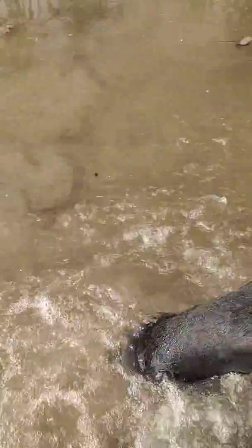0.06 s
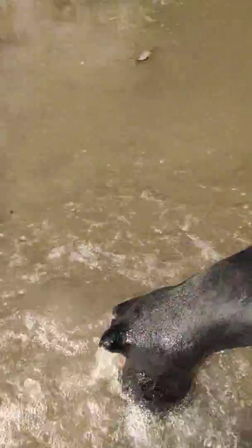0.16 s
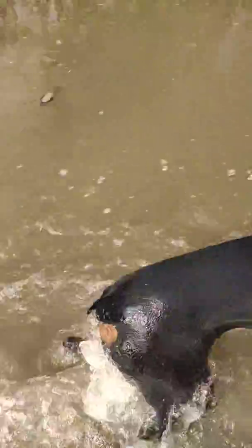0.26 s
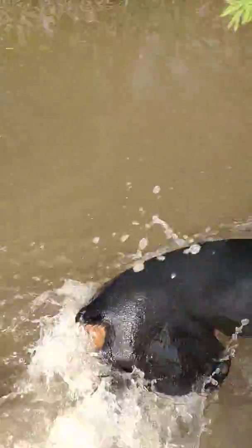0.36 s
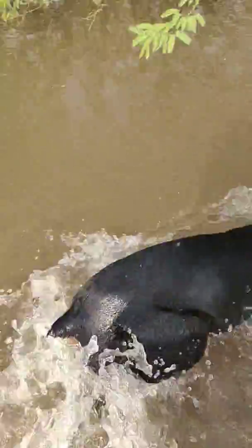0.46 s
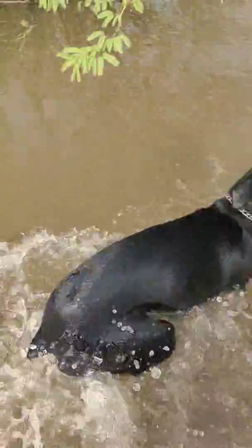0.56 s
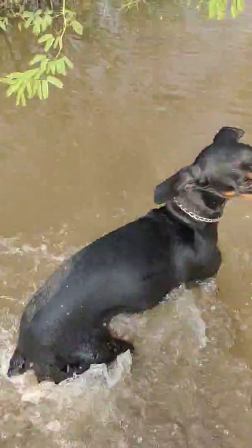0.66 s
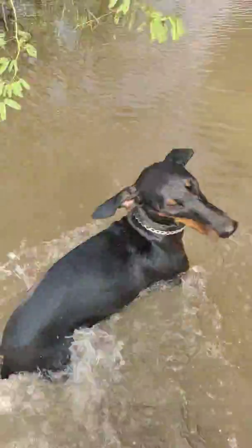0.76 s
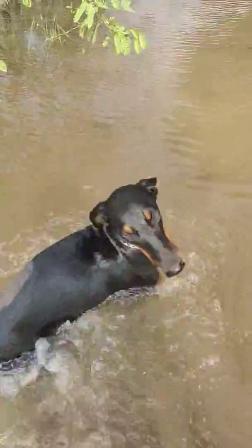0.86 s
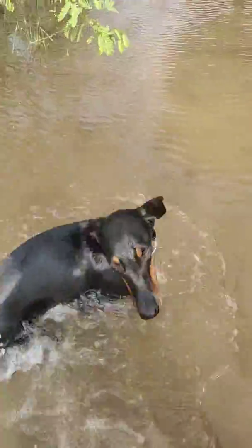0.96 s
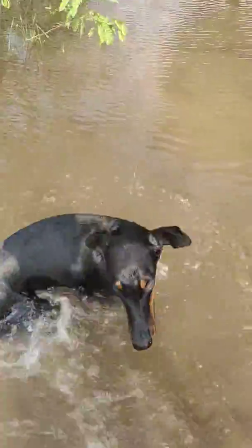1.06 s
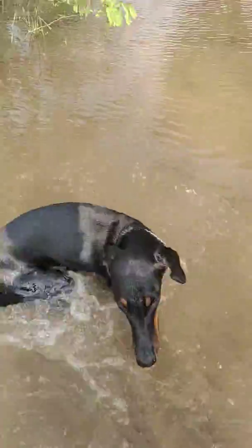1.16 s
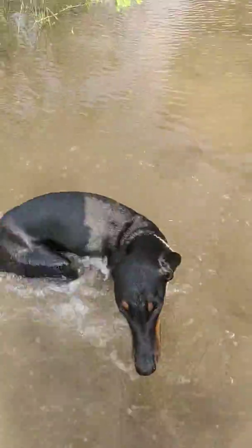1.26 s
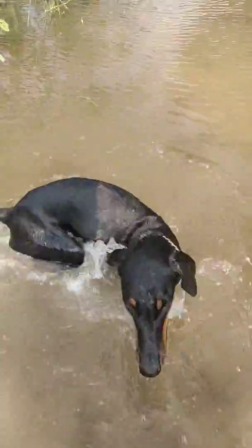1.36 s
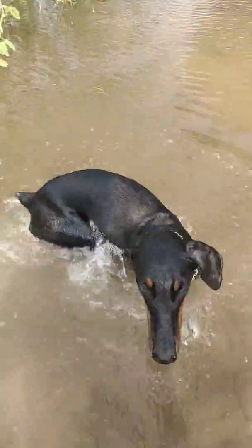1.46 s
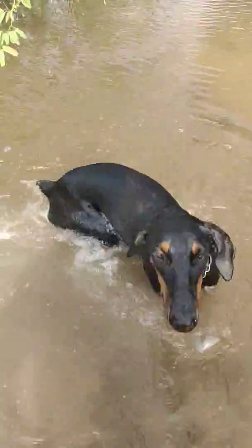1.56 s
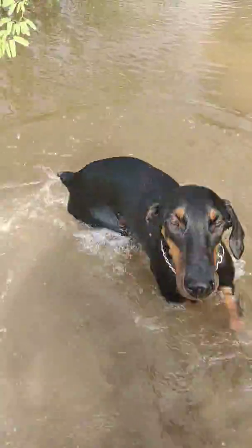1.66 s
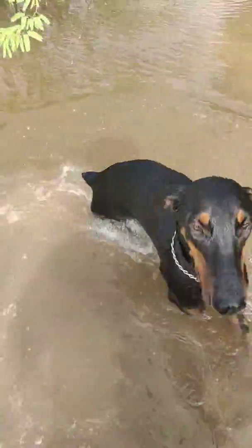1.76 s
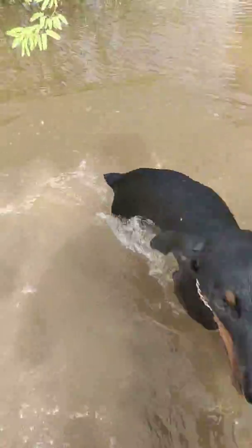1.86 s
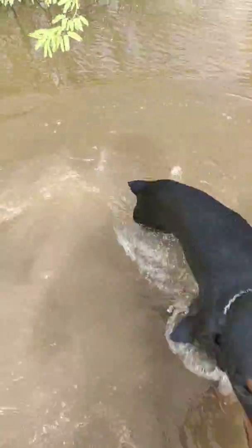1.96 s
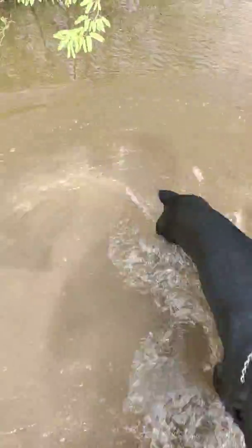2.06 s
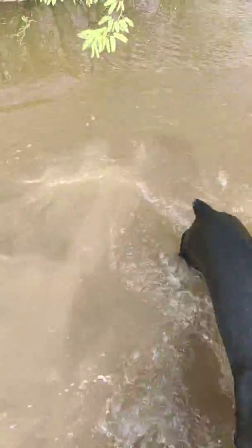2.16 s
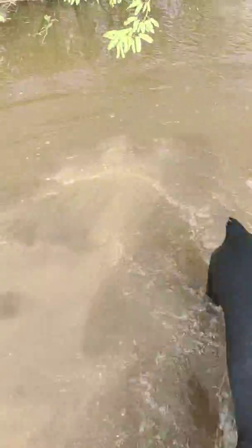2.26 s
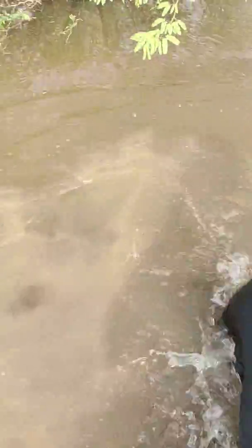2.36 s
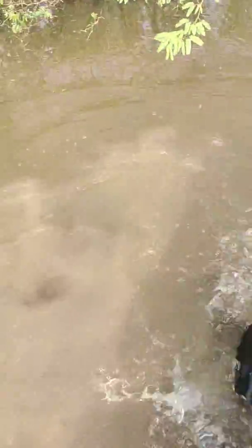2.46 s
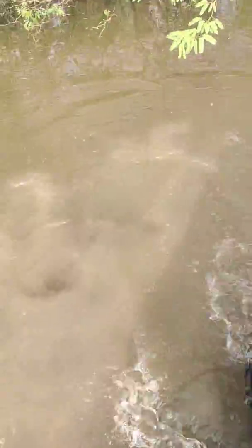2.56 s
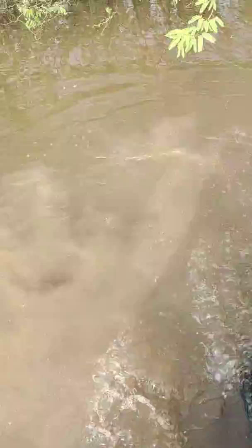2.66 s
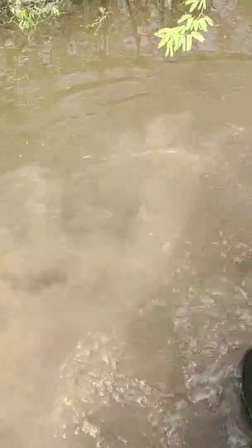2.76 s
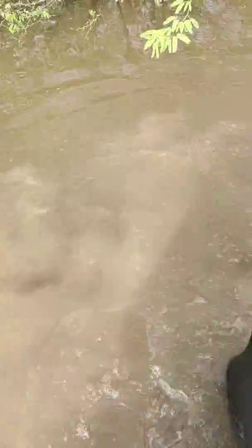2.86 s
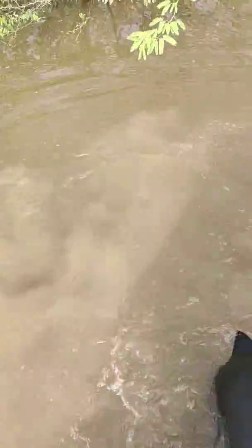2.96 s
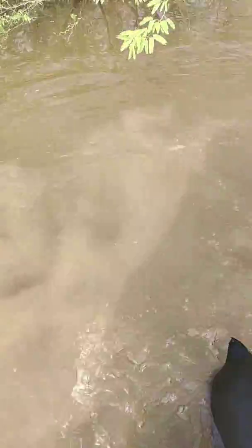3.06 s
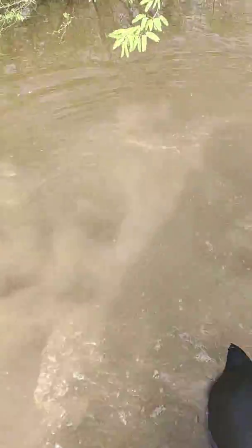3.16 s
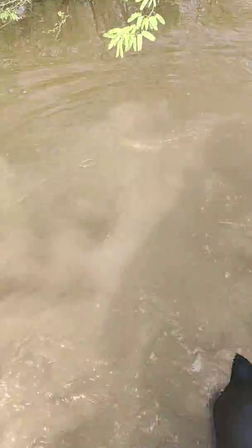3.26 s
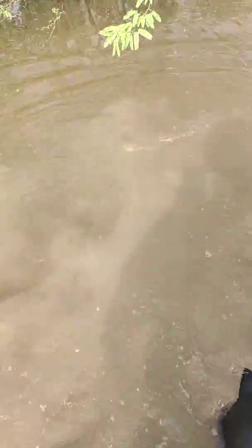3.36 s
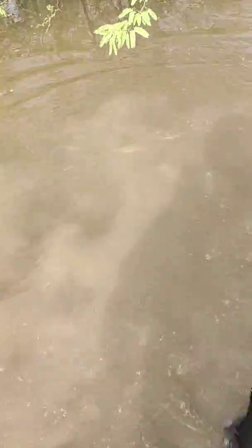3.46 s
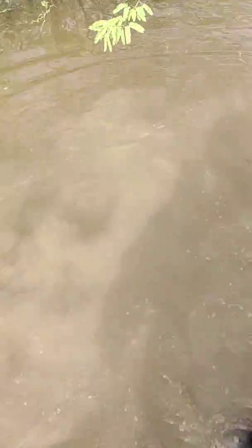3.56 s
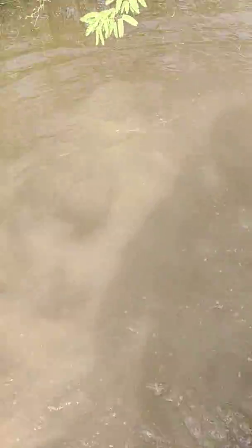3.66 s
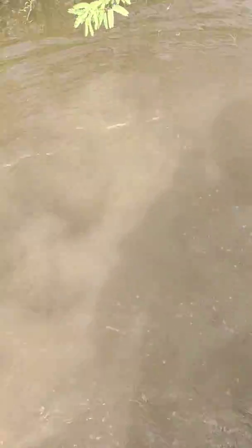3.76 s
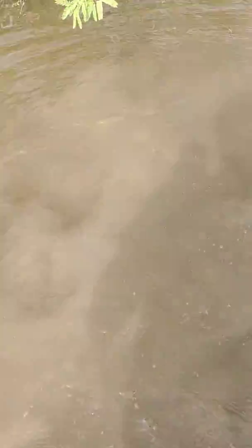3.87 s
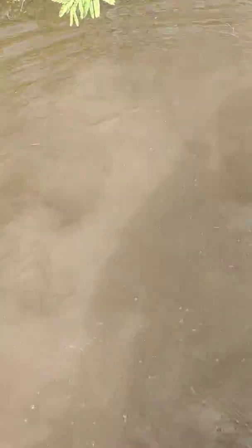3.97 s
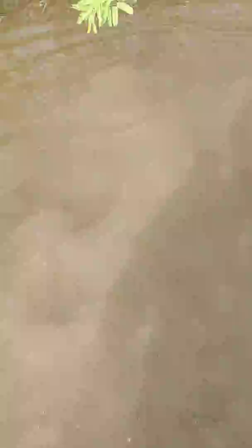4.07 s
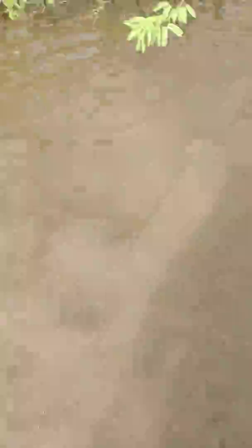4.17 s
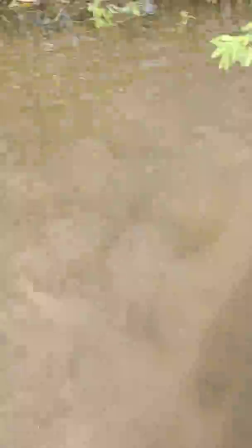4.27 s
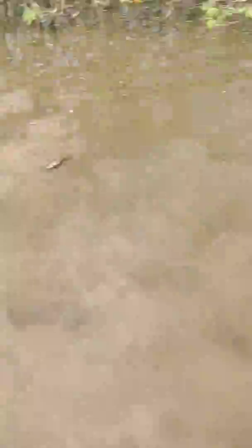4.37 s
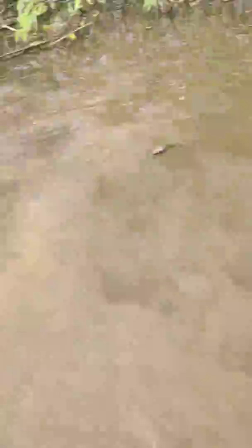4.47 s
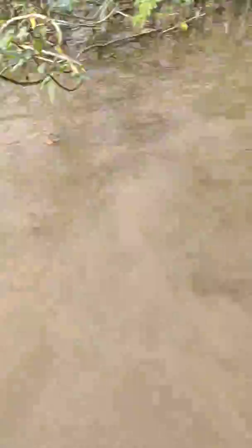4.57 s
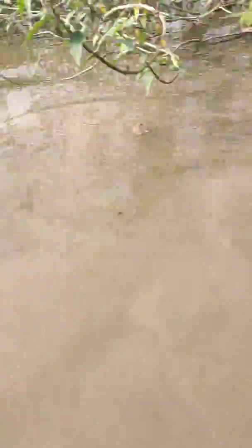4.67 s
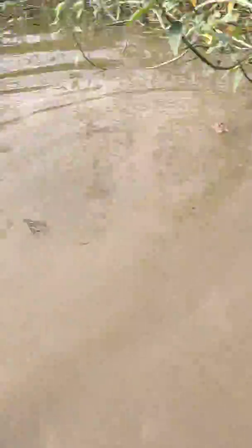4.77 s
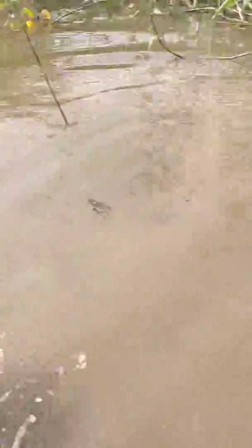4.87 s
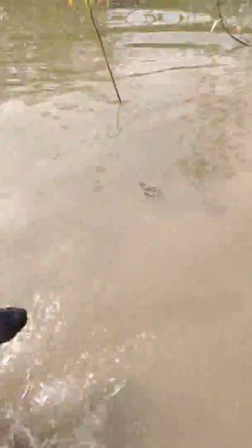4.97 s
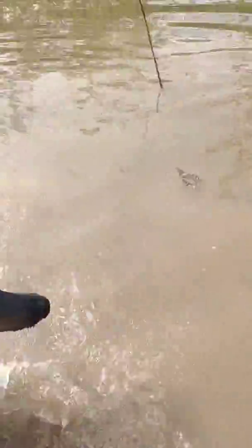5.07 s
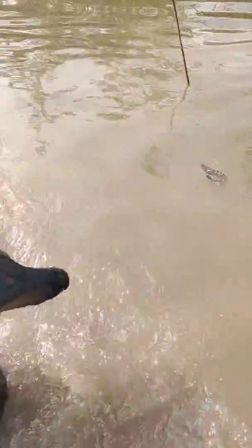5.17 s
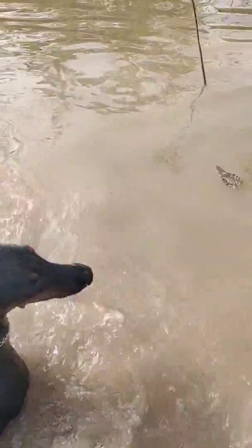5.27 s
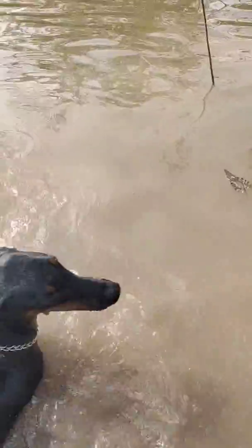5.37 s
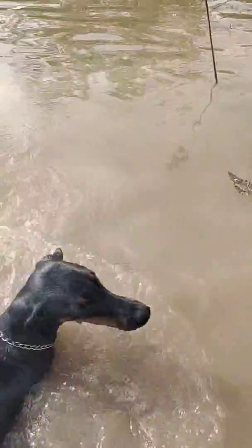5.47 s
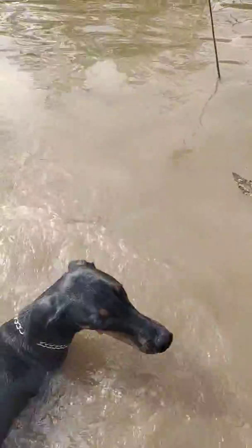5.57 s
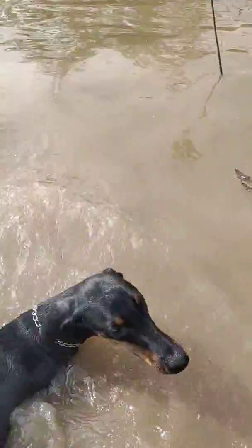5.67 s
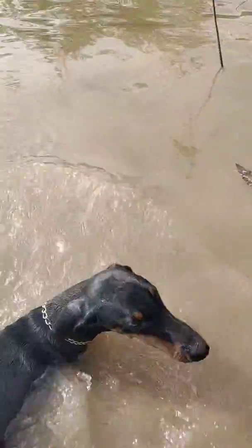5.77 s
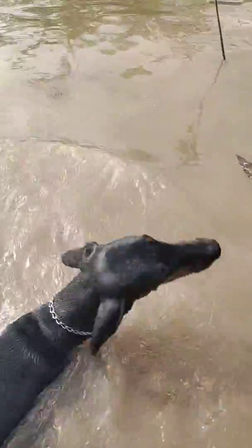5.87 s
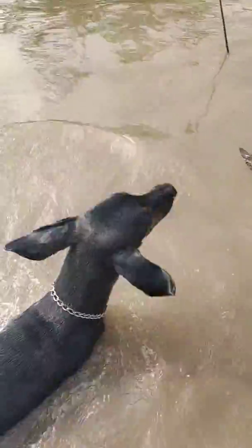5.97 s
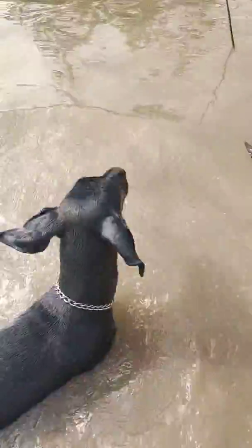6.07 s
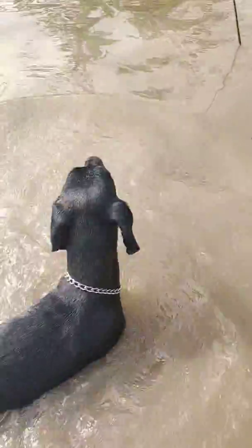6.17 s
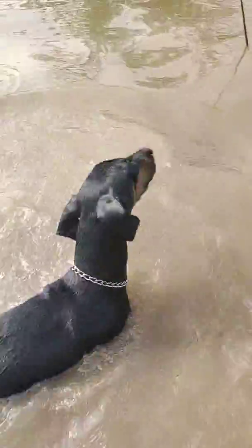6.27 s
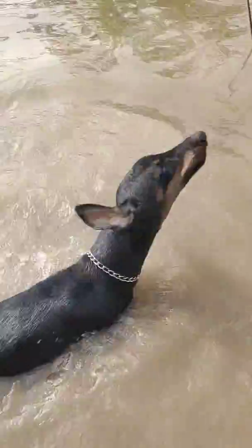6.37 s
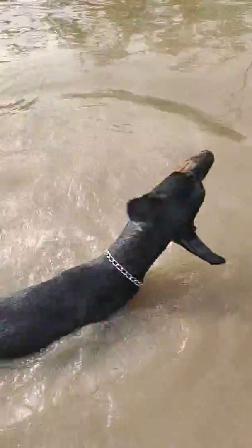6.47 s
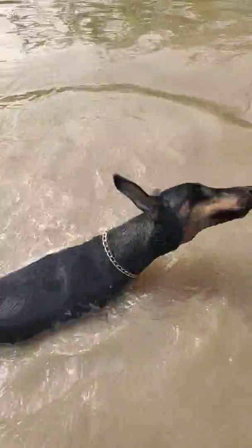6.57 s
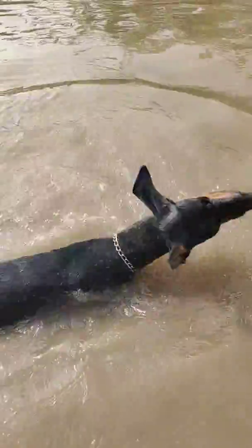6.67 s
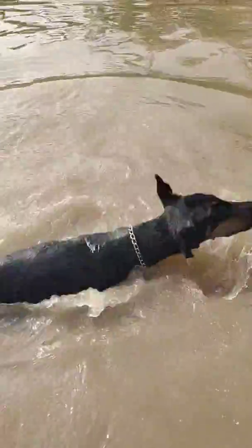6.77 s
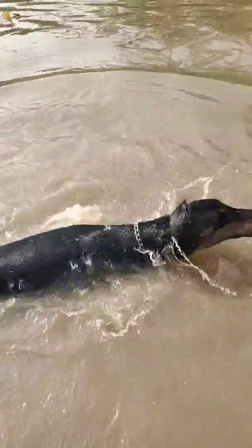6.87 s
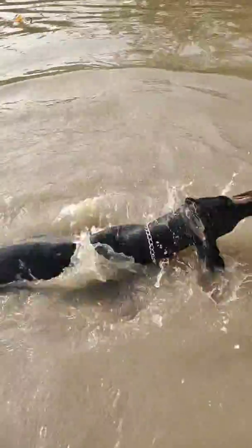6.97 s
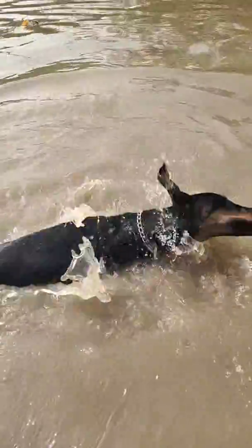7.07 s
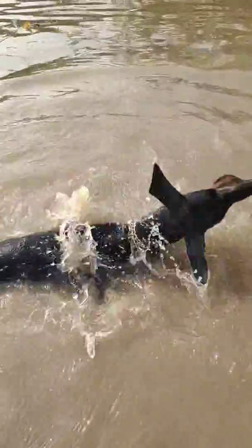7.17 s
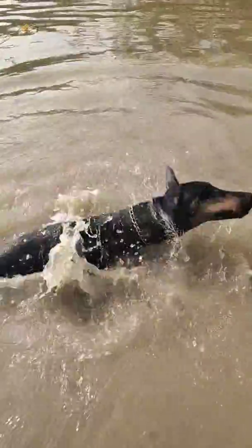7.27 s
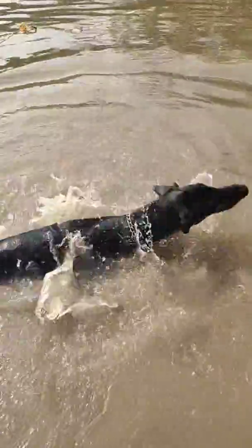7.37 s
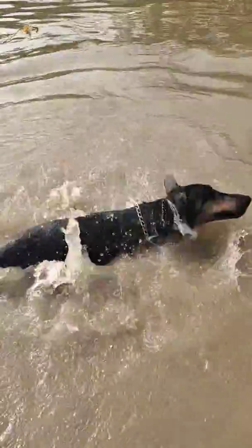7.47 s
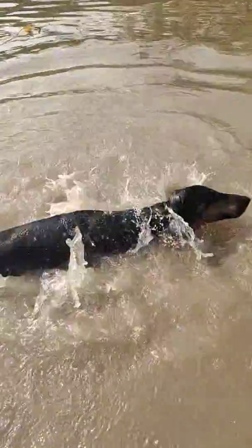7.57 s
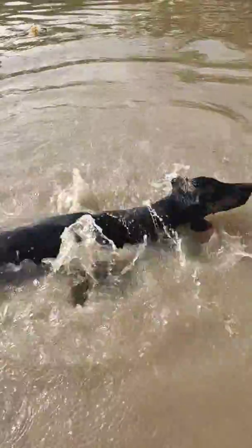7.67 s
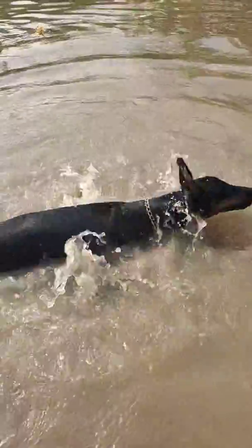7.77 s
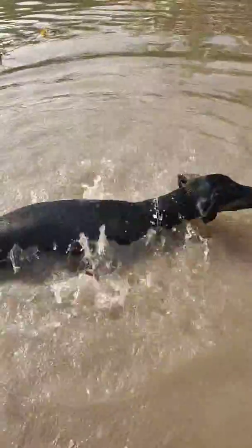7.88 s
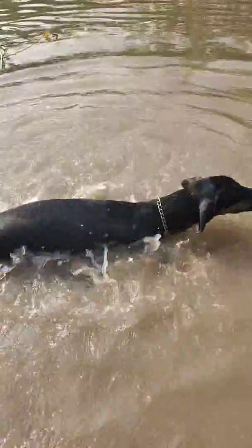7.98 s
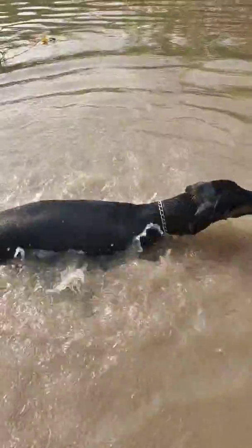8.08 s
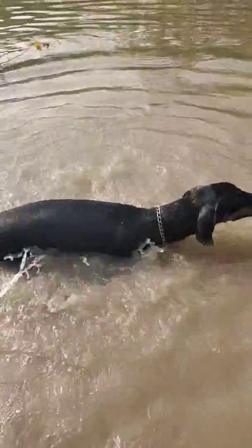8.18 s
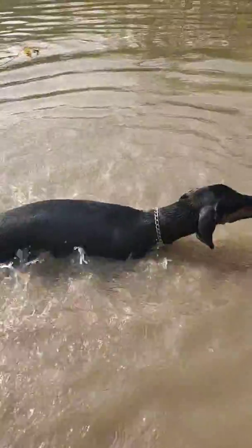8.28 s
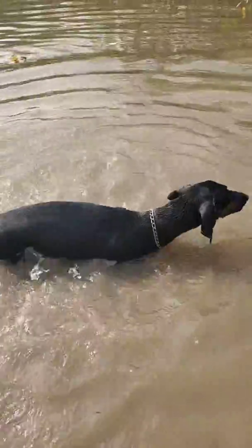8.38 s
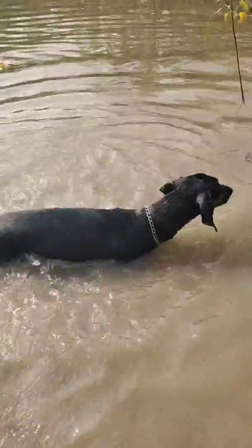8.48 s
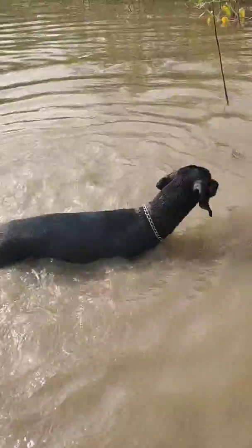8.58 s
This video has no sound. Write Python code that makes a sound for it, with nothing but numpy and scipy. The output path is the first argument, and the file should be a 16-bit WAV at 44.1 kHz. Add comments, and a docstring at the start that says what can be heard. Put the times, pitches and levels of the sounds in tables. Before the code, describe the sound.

A dog moves through shallow floodwater close to a stereo handheld microphone. Strong splashes and sloshing come first, then lighter steps with bubbling gurgles, then near stillness. Small plops lead to a second burst of gulping splashes that fades. After a brief smooth swish, loud hollow slaps and flapping spray mark a shake, with settling slosh, a tiny high ring and low wind thumps. Open air, little echo.

```python
"""A dog lunges and wades through floodwater, then shakes itself, close to two microphone ports.
Each surge folds air into clouds of ringing bubbles fused with noise, and throws spray; slaps shut air pockets.
Hollows gurgle in sliding notes, single bubbles plop, drops tick, sheets smack, and noise foam fizzes.
Filtered noise makes the faint air and a breeze that rumbles at the start and near the end."""
import sys
import numpy as np
from scipy import signal
from scipy.fft import rfft, irfft, next_fast_len
from scipy.io import wavfile
from scipy.ndimage import uniform_filter1d, map_coordinates

SR = 44100
rng = np.random.default_rng(int(sys.argv[2]) if len(sys.argv) > 2 else 0)


def digitize_waveform(pressure):
    """Quantize a signal to 16-bit integers and store it at the path in sys.argv[1].

    Rows of a 2-D input are taken as channels; values are limited to [-1, 1].
    """
    field = np.atleast_2d(pressure).T
    bounded = np.clip(field, -1, 1)
    quanta = np.round(bounded * 32767).astype(np.int16)
    wavfile.write(sys.argv[1], SR, quanta)


N = 380125

# Breeze level, mean of both ports: [time_s, level_db]
BREEZE_LEVEL = [(0, -51.5), (.7, -49), (1.0, -79), (6.3, -77), (7.2, -62.5), (7.75, -51), (7.95, -58),
                (8.33, -54.5), (8.39, -45.5), (8.62, -44.5)]
# Breeze noise colour: [freq_hz, relative_db]
BREEZE_SPECTRUM = [(20, -43.5), (45, -23.5), (80, -2), (130, -6.5), (180, -9), (280, -28.5), (800, -50.5)]
# Puffs thumping on the microphone: [centre_s, level_db, pitch_hz]
BUFFET_EVENTS = [(6.311, -55, 110), (8.196, -43, 93), (8.405, -38, 126), (8.503, -38.5, 149.2),
                 (8.607, -32.5, 98.8)]
# Still air colour: [freq_hz, relative_db]
AIR_SPECTRUM = [(25, -10), (90, -1.5), (180, -13), (400, -6), (800, -61.5), (3000, -14), (16000, -26.5)]
# Echo decay of the overgrown bank: [freq_hz, t60_s]
BANK_DECAY = [(200, 0.12), (1500, 1), (12000, 0.033)]
# Difference between the microphone ports: [freq_hz, left_minus_right_db]
PORT_BALANCE = [(90, -6), (300, 1.5), (900, 3), (1350, -1.5), (1700, 6), (2200, -2.5), (3300, 2.5),
                (5300, 2.5), (6400, 12.5), (7400, -1.5), (8600, -10), (10000, -1.5), (12000, 0),
                (14000, 15.5), (16000, -7)]
# Direction of the splashing: [time_s, left_lag_ms]
BEARING_LAG = [(0, -0.1), (2.2, -0.11), (4.9, -0.28), (6, 0.015), (7, 0.19), (8.6, 0.17)]
# Drops striking the surface: [start_s, level_db]
DROP_EVENTS = [(0.362, -12), (1.2404, -32), (1.2814, -29), (1.3321, -24.5), (2.386, -30), (3.378, -39),
               (4.149, -28.5), (4.2056, -21.5), (4.353, -26.5), (4.376, -31.5), (4.758, -14.5),
               (4.797, -18), (5.263, -31), (6.6564, -34), (7.029, -21), (7.336, -19.5)]
# Single bubbles: [start_s, level_db, start_pitch_hz, rise_octaves_per_s]
PLOP_EVENTS = [(1.133, -38, 1710, -1), (1.242, -27, 6160, -8), (1.485, -46, 860, -3), (1.6, -32, 1013, 4.5),
               (1.771, -32.5, 1013, 6.5), (1.842, -30, 857, -0.5), (1.932, -37.5, 506, 6),
               (2.243, -31, 398, -0.5), (2.384, -27, 332, -6.5), (3.346, -55, 1270, -4),
               (3.378, -32.5, 9770, -3), (3.425, -47, 557, -2.5), (3.559, -43, 1460, -4),
               (3.689, -48, 460, -7.5), (3.957, -33, 1000, 7), (4.009, -32, 700, -11),
               (4.092, -35.5, 820, 3), (4.157, -32.5, 508, 5.5), (4.339, -29.5, 556, -2),
               (4.474, -34, 1600, 0), (4.759, -12, 556, -13), (4.842, -21, 381, 4), (4.88, -19, 334, -1),
               (4.928, -20, 384, 1.5), (4.944, -37.5, 132, 3), (5.033, -30.5, 366, 0.5),
               (5.142, -23, 400, 1.5), (5.16, -36, 1300, 7), (5.377, -33, 683, 6.5),
               (5.644, -46.5, 903, 16), (5.652, -47, 1930, -1), (5.731, -46.5, 1200, 3),
               (5.745, -48, 2300, -6), (5.915, -51, 1880, -10), (6.165, -49.5, 686, 2.5),
               (6.462, -48, 4730, -2), (7.149, -27, 3300, 0), (8.0, -22, 817, -15.5),
               (8.022, -39.5, 503, 22.5), (8.228, -36.5, 984, 5.5), (8.316, -38, 671, 12.5)]
# Hollows closing behind the dog: [start_s, length_s, level_db, first_pitch_hz, last_pitch_hz]
GURGLE_EVENTS = [(0.235, 0.051, -33.5, 216, 415), (1.188, 0.01, -35, 784, 1110),
                 (1.19, 0.015, -42, 420, 490), (2.116, 0.067, -45.5, 742, 418),
                 (2.193, 0.038, -40.5, 346, 423), (2.281, 0.057, -38.5, 399, 740),
                 (2.423, 0.061, -38.5, 331, 462), (2.613, 0.043, -40.5, 434, 708),
                 (2.671, 0.0475, -36, 427, 800), (2.724, 0.023, -40.5, 498, 627),
                 (2.812, 0.026, -40.5, 683, 916), (4.35, 0.026, -39.5, 565, 500),
                 (4.415, 0.047, -41.5, 523, 810), (4.472, 0.029, -37, 628, 854),
                 (4.534, 0.033, -40, 433, 500), (4.984, 0.025, -28.5, 590, 806),
                 (5.429, 0.031, -44.5, 945, 1230), (6.743, 0.029, -35, 1242, 2450),
                 (7.891, 0.032, -32.5, 532, 1054), (7.938, 0.026, -36, 1082, 1320),
                 (8.029, 0.016, -41, 890, 1150), (8.44, 0.035, -43.5, 590, 640),
                 (8.543, 0.03, -42.5, 322, 363)]
# Sheets of water landing flat: [start_s, level_db]
SHEET_EVENTS = [(0.108, -21), (0.302, -18), (0.352, -21.5), (0.417, -22.5), (0.469, -26.5), (0.72, -26),
                (1.272, -41), (1.32, -35), (2.048, -46), (2.115, -37.5), (2.544, -28.5), (2.638, -38),
                (4.783, -21), (5.031, -27.5), (7.553, -27.5)]
# Sheet smack colour: [freq_hz, relative_db]
SHEET_SPECTRUM = [(130, -37.5), (320, -3), (800, 5.5), (1700, -1), (2500, -4.5), (6000, -14), (14000, -20)]
# Smooth wave colour: [freq_hz, relative_db]
WASH_SPECTRUM = [(100, -38), (290, 4), (500, -9), (900, -1.5), (1300, -5), (1770, -3), (2600, -18),
                 (3800, -11.5), (7800, -15), (15000, -34)]
# Slaps that shut an air pocket: [start_s, level_db, pocket_hz]
SLAP_EVENTS = [(0.114, -16.5, 1720), (0.305, -17, 870), (0.356, -12, 774), (0.477, -11, 1890),
               (0.516, -12.5, 706), (0.553, -19.5, 600), (0.565, -11.5, 316), (0.772, -20.5, 1600),
               (1.149, -32, 2480), (1.162, -27, 520), (1.174, -29, 1200), (1.182, -15, 786),
               (1.699, -29.5, 2450), (1.82, -28.5, 2720), (1.832, -33.5, 830), (1.84, -21, 3380),
               (2.054, -20, 1520), (2.114, -24.5, 1110), (2.241, -24, 690), (2.384, -16.5, 770),
               (2.427, -21.5, 1650), (2.548, -20, 920), (2.579, -20.5, 1040), (2.639, -17.5, 1690),
               (2.794, -24, 815), (3.033, -41, 1165), (3.957, -20.5, 1780), (4.523, -18, 790),
               (4.656, -23, 675), (4.759, -16.5, 610), (4.793, -20, 746), (4.916, -11, 1100),
               (5.23, -22.5, 714), (5.249, -20.5, 690), (6.726, -16.5, 1095), (6.735, -10.5, 685),
               (6.835, -7.5, 1690), (7.325, -4.5, 1707), (7.436, -15.5, 1650), (7.624, -4.5, 827),
               (7.744, -11.5, 1305), (8.217, -22.5, 1490), (8.316, -25, 780), (8.351, -17.5, 1366),
               (8.574, -27, 1130)]
# Wet ears and flanks flapping in the shake: [start_s, level_db]
FLAP_EVENTS = [(6.616, -37.5), (6.733, -32.5), (6.806, -38), (6.914, -31.5), (7.037, -23), (7.085, -33.5),
               (7.168, -31), (7.225, -32), (7.284, -31), (7.326, -33.5), (7.399, -33.5), (7.437, -39.5),
               (7.509, -27.5), (7.624, -28), (7.673, -35), (7.747, -30.5), (7.799, -31), (8.018, -35.5)]
# Shoves of the body: [start_s, hold_s, strength_db, depth (0 skimming to 1 plunging)]
SURGE_EVENTS = [(0.0, 0.01, -36, 0.54), (0.119, 0.01, -35, 0.58), (0.31, 0.18, -30.5, 0.58),
                (0.538, 0.1, -32.5, 0.76), (0.64, 0.11, -33.5, 0.32), (0.808, 0.03, -40, 0.54),
                (0.92, 0.01, -44, 0.34), (1.029, 0.03, -47.5, 0.37), (1.167, 0.01, -46, 0.63),
                (1.289, 0.05, -46, 0.36), (1.523, 0.14, -57, 0.1), (1.707, 0.02, -51.5, 0.15),
                (1.833, 0.01, -49, 0.17), (2.05, 0.03, -45, 0.26), (2.16, 0.15, -41, 0.36),
                (2.391, 0.08, -40, 0.4), (2.55, 0.11, -41, 0.4), (2.79, 0.01, -49.5, 0.42),
                (3.62, 0.22, -76, 0.85), (3.859, 0.07, -63, 0.3), (3.991, 0.11, -48.5, 0.12),
                (4.16, 0.01, -43.5, 0.3), (4.339, 0.21, -49, 0.47), (4.66, 0.07, -42, 0.47),
                (4.79, 0.01, -30, 0.54), (4.86, 0.15, -33.5, 0.58), (5.121, 0.04, -39.5, 0.53),
                (5.251, 0.01, -43.5, 0.42), (5.369, 0.15, -52.5, 0.37), (6.489, 0.07, -67.5, 0.01),
                (6.639, 0.01, -49.5, 0.44), (6.801, 0.18, -45, 0.36), (7.04, 0.13, -42.0, 0.21),
                (7.231, 0.58, -39.5, 0.24), (7.88, 0.14, -42.5, 0.16), (8.099, 0.14, -49.5, 0.16),
                (8.351, 0.25, -45.5, 0.2)]
# Bursting foam level: [time_s, level_db]
FOAM_LEVEL = [(0, -46), (2.9, -56), (3.8, -59.5), (5.3, -52.5), (5.9, -64), (6.5, -86), (8.62, -75.5)]
# Foam colour: [freq_hz, relative_db]
FOAM_SPECTRUM = [(1500, -24.5), (4000, -5.5), (6000, -5), (7300, -8.5), (8300, -7.5), (9200, -10),
                 (11000, -6), (13500, 0), (16000, -4)]
# Colours of the bubble clouds, largest bubbles first, each: [freq_hz, relative_db]
GULP_SPECTRUM = [(100, -57.5), (170, -7.5), (240, -3.5), (290, -0.5), (420, 1.5), (600, 0), (1000, -32)]
SLOSH_SPECTRUM = [(200, -42.5), (350, -26), (500, -2.5), (800, 5.5), (1250, 2.5), (1700, 6.5), (2100, -3),
                  (3000, -16)]
SPLATTER_SPECTRUM = [(1200, -27.5), (2100, -0.5), (2600, 2.5), (3800, 0), (5000, -4.5), (6300, -19.5),
                     (8000, -21)]
FIZZ_SPECTRUM = [(2000, -17), (4000, -0.5), (6300, 4.5), (7300, -4.5), (8300, 1.5), (9200, -5.5),
                 (11000, -1.5), (13500, 1.5), (16000, -0.5)]

TOP_HZ = 15900  # band limit
BUFFET_S = 0.016  # puff centre to 1/e of its level
CHINK_AT_S = 7.875
# ring time of a steady plop at PLOP_HZ; larger bubbles ring longer
PLOP_T60_S, PLOP_HZ, PLOP_SIZE_LAW = 0.07, 715, 0.7
PLOP_DRIVE = .03  # extra share of ring time per octave per s: a rising pocket keeps being squeezed
# depth and knots per s of the trembling; cycles to fall 60 dB after closing
GURGLE_ROUGH, GURGLE_FLUTTER_PER_S, GURGLE_CYCLES = .6, 170, 18
SHEET_S = 0.005  # landing to loudest
WASH_AT_S, WASH_DB, WASH_RISE_DB_PER_S, WASH_FALL_DB_PER_S = 6.05, -51, 86, 145.5
FUSE_LAW = 0.51  # dB of wash per dB of churning: hard surges fuse, gentle ones keep bubbles apart
# contact drives, before the gains in slaps(): slap spray re pocket, slap thud = offset + law * gulp dB
SLAP_SPRAY_DB, SLAP_THUD_DB, SLAP_THUD_LAW = -28, 26, 1.845
FLAP_POCKET_HZ, FLAP_POCKET_DB, FLAP_THUD_DB = 1744, 11, -15.5  # every flap alike; dB re its spray drive
RISE_DB_PER_S, COLLAPSE_DB_PER_S = 220, 133  # surge build; collapse when the shove ends
WAKE_DB, SETTLE_DB_PER_S = -17.5, 34  # slowly settling wake
LAPPING_DB = -87  # floor of the surge levels: never quite still
# gulp and spray drives of a skimming surge, and gain at full depth: a deep shove throws less spray
GULP_DB, GULP_DEPTH_DB, SPRAY_DB, SPRAY_DEPTH_DB = -28, 36, 2, -15.5
GULP_LINGER, SPRAY_LINGER = 0.81, 1.2  # duration of the dying away re sloshing


def amp(db):
    """Decibels to gain."""
    return 10 ** (np.asarray(db) / 20)


def unit(x):
    """Scale to rms 1."""
    return x / np.sqrt(np.mean(x ** 2) + 1e-20)


def along(points, hz):
    """Read (Hz, value) points on a log frequency axis."""
    f, v = np.transpose(points)
    return np.interp(np.log(hz + 1), np.log(f + 1), v)


def curves(rows):
    """One value per sample for each column after the time."""
    time_s, *columns = np.transpose(rows)
    return [np.interp(np.arange(N) / SR, time_s, column) for column in columns]


def wobble(knots_per_s):
    """Smooth random curve through normal knots."""
    knots = rng.standard_normal(int(N * knots_per_s / SR) + 4)
    return map_coordinates(knots, [np.arange(N) * knots_per_s / SR])


def filtered(x, response):
    """Multiply the spectrum of x by a response of frequency."""
    size = next_fast_len(N + SR // 2)
    return irfft(rfft(x, size) * response(np.fft.rfftfreq(size, 1 / SR)), size)[..., :N]


def coloured(x, spectrum, size=4096):
    """Causal minimum-phase filter with the given (Hz, dB) spectrum, by folding the cepstrum."""
    gain = amp(along(spectrum, np.fft.rfftfreq(size, 1 / SR)))
    cepstrum = irfft(np.log(gain))
    cepstrum[1:size // 2] *= 2
    cepstrum[size // 2 + 1:] = 0
    impulse = irfft(np.exp(rfft(cepstrum)))
    return signal.oaconvolve(x, impulse[None], axes=1)[:, :N]


def add(track, start_s, sound):
    """Mix a sound into a stereo track."""
    part = track[:, max(round(start_s * SR), 0):][:, :sound.shape[-1]]
    part += sound[..., :part.shape[1]]


def ages(start_s, t, scatter_ms):
    """Seconds since the splash reached the left and right microphone; the bearing delays one side."""
    scatter = scatter_ms * rng.standard_normal(np.shape(start_s))
    lag_s = (np.interp(start_s, *np.transpose(BEARING_LAG)) + scatter) / 1000
    left = t - np.maximum(lag_s, 0)
    right = t + np.minimum(lag_s, 0)
    return np.maximum(np.array([left, right]), 0)


def bubble(t, hz, t60, rise):
    """Damped air pocket; pitch changes by rise octaves per s, up as it nears the surface."""
    phase = 2 * np.pi * hz * t * (1 + np.log(2) * rise / 2 * t)
    return np.sin(np.float32(phase)) * np.exp(np.float32(-np.log(1000) / t60 * t))


def spatter(t, width_s):
    """Short spray burst: noise under a quick swell and fall, broken into tiny impacts."""
    burst = t / width_s
    impacts = np.repeat(amp(3.3 * rng.standard_normal(len(t))), 30)[:len(t)]
    return burst * np.exp(-burst) * impacts * rng.standard_normal((2, len(t)))


def rush(spectrum, apart_db):
    """Smooth rms-1 noise from the dog's direction; apart_db sets the part the microphones do not share."""
    lag_ms, = curves(BEARING_LAG)
    n, source = np.arange(N), rng.standard_normal(N)
    shared = np.array([np.interp(n + side * lag_ms * SR / 2000, n, source) for side in (-1, 1)])
    separate = amp(apart_db) * rng.standard_normal((2, N))
    return unit(coloured(shared + separate, spectrum))


def surge_level(offset_db, depth_db, linger):
    """Level in dB of one bubble size: each surge builds, holds, collapses and leaves a settling wake."""
    t = np.arange(0, N / SR, .001)
    start, hold, db, depth = np.transpose(SURGE_EVENTS)[:, :, None]
    before = np.maximum(start - t, 0)
    after = np.maximum(t - start - hold, 0) / linger
    release_db = np.maximum(-COLLAPSE_DB_PER_S * after, WAKE_DB - SETTLE_DB_PER_S * after)
    each = amp(db + offset_db + depth_db * depth - RISE_DB_PER_S * before + release_db)
    total = np.linalg.norm(each, axis=0) + amp(LAPPING_DB)
    return np.interp(np.arange(N) / SR, t, 20 * np.log10(total))


def slosh_level():
    """Middle-sized bubbles follow surge strength alone."""
    return surge_level(0, 0, linger=1)


def gulp_level():
    """Large bubbles need a deep shove and are gone soonest."""
    return surge_level(GULP_DB, GULP_DEPTH_DB, GULP_LINGER)


def buffets():
    """Each puff shakes the microphone ports for a few slow cycles, slightly out of step."""
    t, out = np.arange(N) / SR, np.zeros((2, N))
    for centre_s, db, hz in BUFFET_EVENTS:
        near = np.abs(t - centre_s) < BUFFET_S * np.pi
        age = t[near] - centre_s
        phase = 2 * np.pi * hz * age + .5 * rng.standard_normal((2, 1))
        out[:, near] += amp(db) * np.exp(-(age / BUFFET_S) ** 2) * np.sin(phase)
    return out


def outdoors():
    """Faint still air, and a partly shared low rumble of breeze, stronger on the left."""
    breeze_db, = curves(BREEZE_LEVEL)
    eddies = rng.standard_normal((2, N)) + .5 * rng.standard_normal(N)
    rumble = unit(coloured(eddies, BREEZE_SPECTRUM))
    breeze = amp(breeze_db + 2.5 * wobble(14)) * rumble + buffets()
    air = amp(-71.5) * unit(coloured(rng.standard_normal((2, N)), AIR_SPECTRUM))
    return breeze * amp(np.array([[1], [-1]]) * 9.6) + air


def bank(x):
    """The overgrown bank scatters back a short tail: noise decaying at a rate set by frequency."""
    hz, t, z = signal.stft(rng.standard_normal((2, SR // 3)), SR, nperseg=256)
    decay = amp(-60 * t / along(BANK_DECAY, hz)[:, None])
    tail = signal.istft(z * decay, SR, nperseg=256)[1]
    return signal.fftconvolve(x, tail / np.linalg.norm(tail[0]), axes=1)[:, :N]


def chink(db=-27, hz=6000, t60=0.13):
    """One thin, wavering high ring, perhaps the chain collar."""
    age = np.maximum(np.arange(N) / SR - CHINK_AT_S, 0)
    envelope = amp(db - 60 * age / t60) * (1 - np.exp(-age / 0.013))
    return envelope * np.sin(2 * np.pi * hz * age + wobble(150))


def drops():
    """Thrown drops hit the surface with a bright tick of spatter."""
    out, t = np.zeros((2, N)), np.arange(SR // 30) / SR
    for start_s, db in DROP_EVENTS:
        add(out, start_s, amp(db + 4.0) * spatter(t, width_s=0.0022))
    return coloured(out, [(100, -40.5), (500, -29.5), (3000, 1.5), (8000, -5.5), (14000, -2.0)])


def drips(count=760):
    """Runoff and ripples leave short pips and clear rising notes, a few even in the lulls."""
    slosh_db = slosh_level()
    births = np.cumsum(amp(np.minimum(slosh_db, -54) * .5))
    out, t = np.zeros((2, N)), np.arange(SR // 16) / SR
    for when, smallness, depth, sustain in rng.random((count, 4)):
        start = np.searchsorted(births, when * births[-1])
        hz = 650 * 9 ** smallness
        db = np.clip(slosh_db[start], -68, -44) + 16 - 5 * smallness - 11 * depth - 5 * sustain
        life = 12 * 3.5 ** sustain / hz
        rise = (1 - smallness) * 0.21 / life  # larger bubbles climb further
        age = ages(start / SR, t, scatter_ms=0.087)
        add(out, start / SR, amp(db) * bubble(age, hz, life, rise) * (1 - np.exp(-age * hz)))
    return out


def plops():
    """Clear bubbles swell within a cycle and ring out alone."""
    out, t = np.zeros((2, N)), np.arange(SR // 6) / SR
    for start_s, db, hz, rise in PLOP_EVENTS:
        t60 = PLOP_T60_S * (PLOP_HZ / hz) ** PLOP_SIZE_LAW * (1 + PLOP_DRIVE * rise)
        age = ages(start_s, t, scatter_ms=.06)
        swell = 1 - np.exp(-(age * hz) ** 2)
        add(out, start_s, amp(db + 2) * swell * bubble(age, hz, t60, rise))
    return out


def gurgles():
    """A closing hollow rings unbroken: its pitch slides, and trembling walls roughen the note."""
    out, t = np.zeros((2, N)), np.arange(SR // 8) / SR
    flutter = wobble(GURGLE_FLUTTER_PER_S) + 1j * wobble(GURGLE_FLUTTER_PER_S)
    tremble = 1 + GURGLE_ROUGH * flutter
    for start_s, length, db, from_hz, to_hz in GURGLE_EVENTS:
        hz = from_hz * (to_hz / from_hz) ** np.minimum(t / length, 1)
        carrier = np.exp(2j * np.pi * np.cumsum(hz) / SR)
        note = np.imag(carrier * np.resize(tremble[round(start_s * SR):], len(t)))
        swell = 1 - np.exp(-(t * hz) ** 2)
        decay = amp(-60 * np.maximum(t - length, 0) * to_hz / GURGLE_CYCLES)
        add(out, start_s, np.interp(ages(start_s, t, scatter_ms=0.076), t, amp(db) * swell * decay * note))
    return out


def sheets():
    """Thrown sheets of water land flat in a short, dense smack of noise."""
    level = np.zeros((2, N))
    landing = np.arange(SR // 12) / SR / SHEET_S
    for start_s, db in SHEET_EVENTS:
        add(level, start_s, amp(db) * landing * np.exp(1 - landing))
    return level * rush(SHEET_SPECTRUM, apart_db=0.5) * amp(1.7 * wobble(700))


def wash():
    """Turning round, the dog pushes a smooth noise wave that swells and runs out without breaking."""
    t = np.arange(N) / SR - WASH_AT_S
    swell_db = np.minimum(WASH_RISE_DB_PER_S * t, -WASH_FALL_DB_PER_S * t)
    swell_db = np.minimum(swell_db, -2)  # blunt crest
    return amp(WASH_DB + swell_db + 0.99 * wobble(67)) * rush(WASH_SPECTRUM, apart_db=-1.5)


def contacts():
    """Slaps and flaps as (start_s, pocket_db, pocket_hz, thud_db, spray_db); slaps in deep surges thud most."""
    thud_db = SLAP_THUD_DB + SLAP_THUD_LAW * gulp_level()
    slapped = [(s, db, hz, thud_db[round(s * SR)], db + SLAP_SPRAY_DB) for s, db, hz in SLAP_EVENTS]
    flapped = [(s, db + FLAP_POCKET_DB, FLAP_POCKET_HZ, db + FLAP_THUD_DB, db) for s, db in FLAP_EVENTS]
    return slapped + flapped


def slaps():
    """Each contact bursts into spray and shuts an air pocket, which shoves the water and rings a few cycles."""
    pockets, thuds, spray = np.zeros((3, 2, N))
    t = np.arange(SR // 12) / SR
    for start_s, db, hz, thud_db, spray_db in contacts():
        age = ages(start_s, t, scatter_ms=0.0091)
        shut_s = start_s + 0.00141  # just after first contact
        ring = bubble(age, hz, t60=0.014, rise=3.8) * np.minimum(age * hz, 1)
        add(pockets, shut_s, amp(db + 2.0) * ring)
        push = age / 0.00048
        add(thuds, shut_s, amp(thud_db + 23.0) * (1 - push) * np.exp(-push) * (age > 0))
        add(spray, start_s - .001, amp(spray_db + 13.5) * spatter(t, width_s=0.0029))
    thuds = coloured(thuds, [(30, -40.5), (90, -2.5), (200, 12), (900, 7.0), (2500, -27.0), (9000, -37.5)])
    spray = coloured(spray, [(100, -39.5), (400, 1.0), (1600, 10.5), (2600, -0.5), (6000, -1.0),
                             (9000, -6.0), (14000, -3.0)])
    return pockets + thuds + spray


def cloud(level_db, spectrum, low_hz, high_hz, cycles, spread_db, glide, even_s, wash_db, apart_db, count):
    """Bubbles fused with turbulent wash; stronger churning is denser and louder (glide: octaves per life)."""
    births = np.cumsum(amp(level_db * .5) * (level_db > -68))
    start = np.searchsorted(births, rng.random((count, 1)) * births[-1])
    hz = low_hz * (high_hz / low_hz) ** rng.random((count, 1))
    life = cycles / hz * np.exp(.5 * rng.standard_normal((count, 1)))
    strength = hz * amp(spread_db * np.minimum(rng.exponential(size=(count, 1)), 4))
    k = np.arange(int(SR * cycles / low_hz))
    age = ages(start / SR, k / SR, scatter_ms=.14)
    rings = strength * bubble(age, hz, life, glide / life) * np.minimum(age * hz, 1)
    pair = np.array([np.bincount((start + k).ravel(), side.ravel(), N)[:N] for side in rings])
    bubbles = unit(coloured(pair, spectrum))
    turbulence = unit(rush(spectrum, apart_db) * amp(FUSE_LAW * np.maximum(level_db, -60)))
    water = bubbles + amp(wash_db) * turbulence
    # bubbles of one moment share the surge energy: level out the running power
    width = max(int(even_s * SR), 2)
    power = uniform_filter1d(uniform_filter1d(np.mean(water ** 2, 0), width), width)
    return amp(level_db) * water / np.sqrt(np.abs(power) + 1e-9)


def churn():
    """The dog's body folds air under: deep gulps, sloshing, splatter and fizzing foam."""
    slosh_db = slosh_level()
    gulp_db = gulp_level()
    spray_db = surge_level(SPRAY_DB, SPRAY_DEPTH_DB, SPRAY_LINGER)
    foam_db, = curves(FOAM_LEVEL)
    # calm water throws hardly any spray
    splatter_db = np.minimum(spray_db + 1.0, 1.7 * spray_db + 42)
    gulp = cloud(gulp_db + 4.5, GULP_SPECTRUM, low_hz=237.6, high_hz=604.5, cycles=12.2, spread_db=1.0,
                 glide=0.16, even_s=0.091, wash_db=-10.0, apart_db=-23.0, count=900)
    slosh = cloud(slosh_db + 2.0, SLOSH_SPECTRUM, low_hz=406.6, high_hz=2477, cycles=21.5, spread_db=3.5,
                  glide=0.4, even_s=0.066, wash_db=-7, apart_db=1.0, count=5000)
    splatter = cloud(splatter_db, SPLATTER_SPECTRUM, low_hz=1900, high_hz=7500, cycles=17, spread_db=4,
                     glide=.08, even_s=.1, wash_db=-4, apart_db=3, count=14000)
    fizz = cloud(spray_db - 0.5, FIZZ_SPECTRUM, low_hz=5270, high_hz=15000, cycles=18, spread_db=2.5,
                 glide=.04, even_s=0.2, wash_db=-4, apart_db=13.5, count=16000)
    crackle = rng.standard_normal((2, N)) * amp(2.9 * wobble(520))
    foam = amp(foam_db) * unit(coloured(crackle, FOAM_SPECTRUM))
    clumps = amp(1.77 * wobble(110))  # spray lands in clumps
    return gulp + slosh + (splatter + fizz) * clumps + foam


def scene():
    """Water close by, its faint echo and the open air."""
    water = churn() + wash() + sheets() + slaps() + gurgles() + plops() + drips() + drops() + chink()
    echo = amp(-19) * bank(water)
    return water + echo + outdoors()


def record(dry):
    """The two microphone ports colour the sound differently; nothing passes the band limit."""
    def response(hz):
        """Left and right gain at equal total power."""
        ports = amp(np.outer([1, -1], along(PORT_BALANCE, hz)) / 2)
        return ports / np.sqrt(np.mean(ports ** 2, 0)) * (hz < TOP_HZ)
    return filtered(dry, response)


dry = scene()
out = record(dry)
digitize_waveform(out)
```